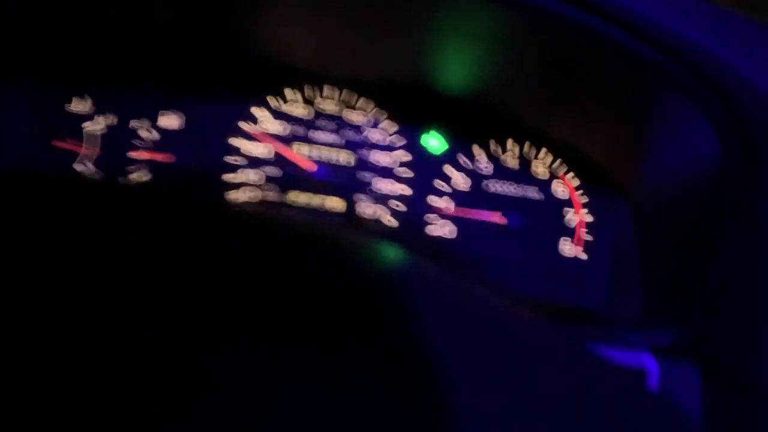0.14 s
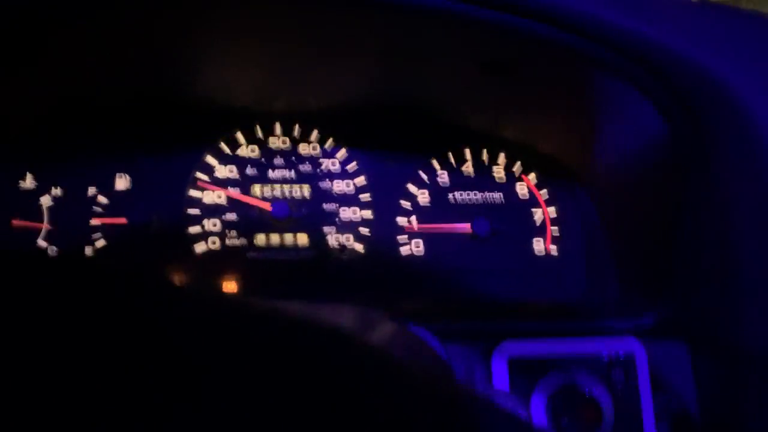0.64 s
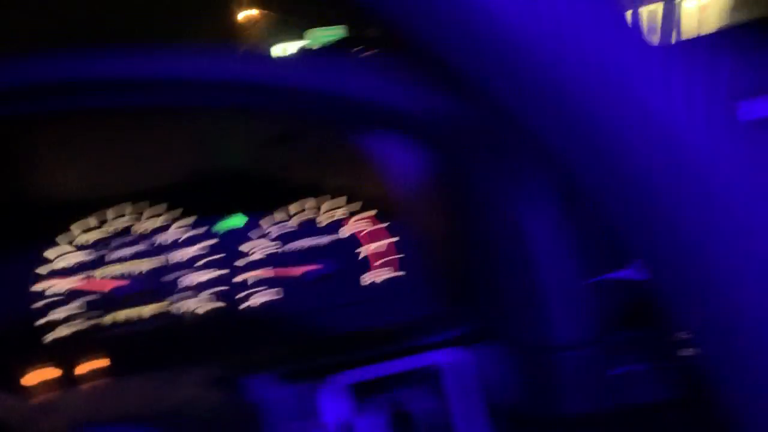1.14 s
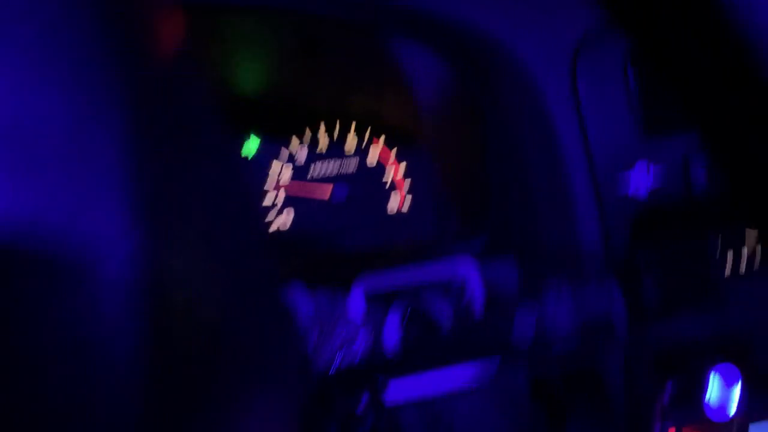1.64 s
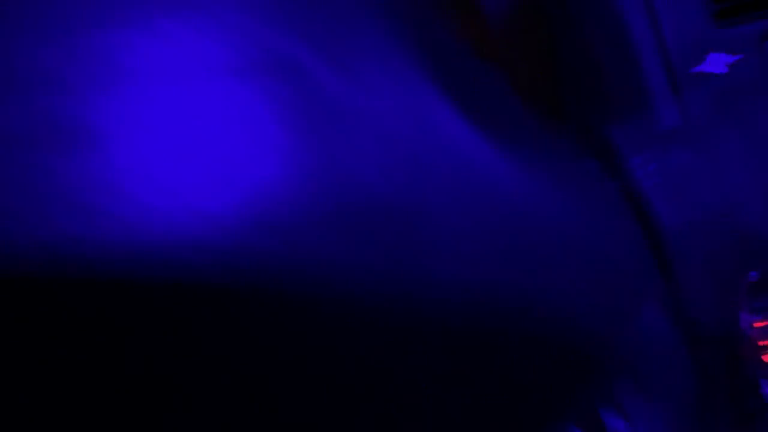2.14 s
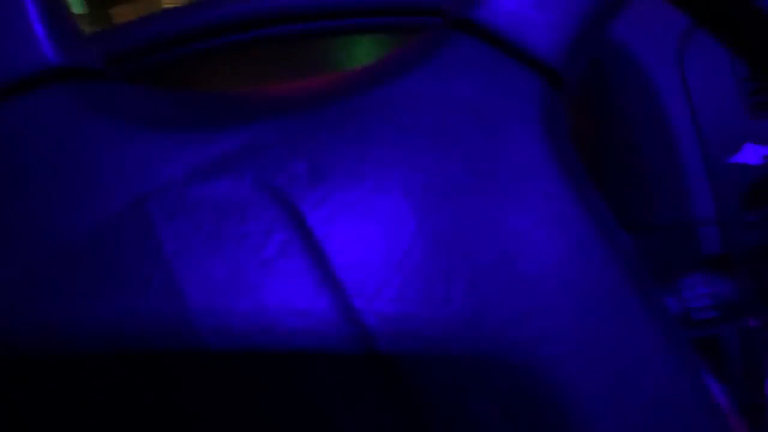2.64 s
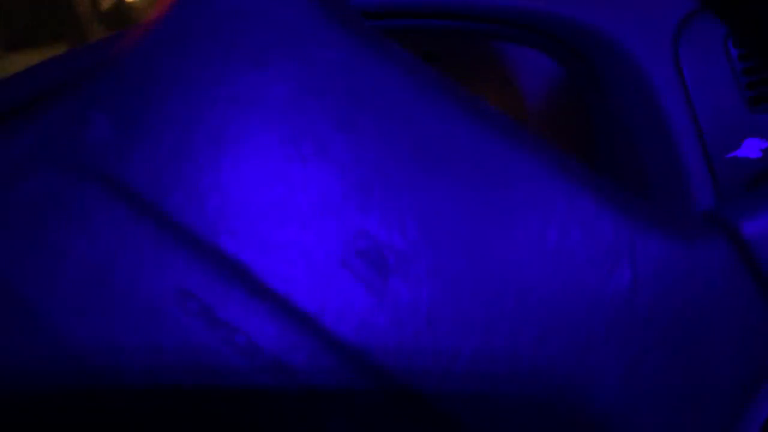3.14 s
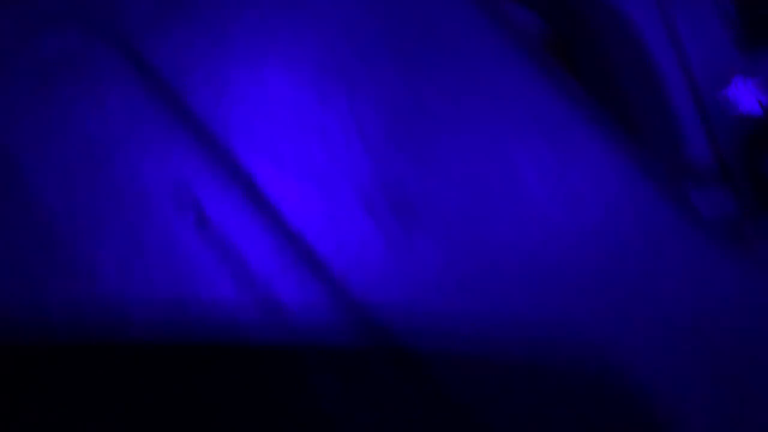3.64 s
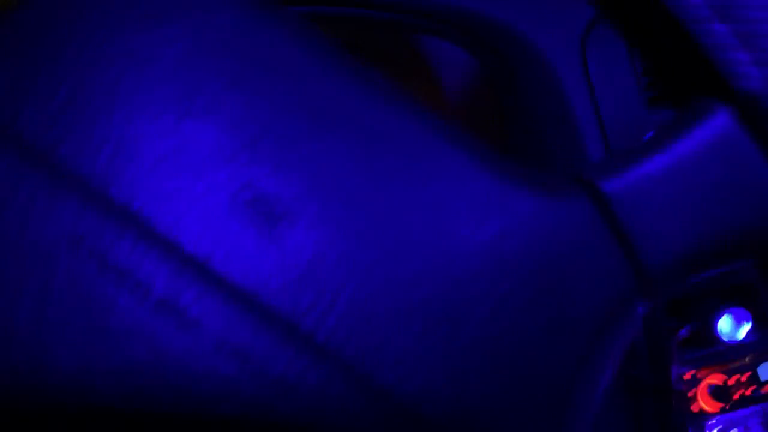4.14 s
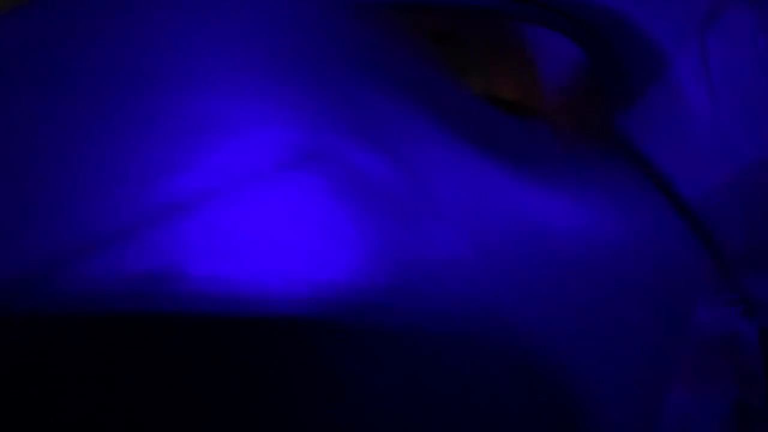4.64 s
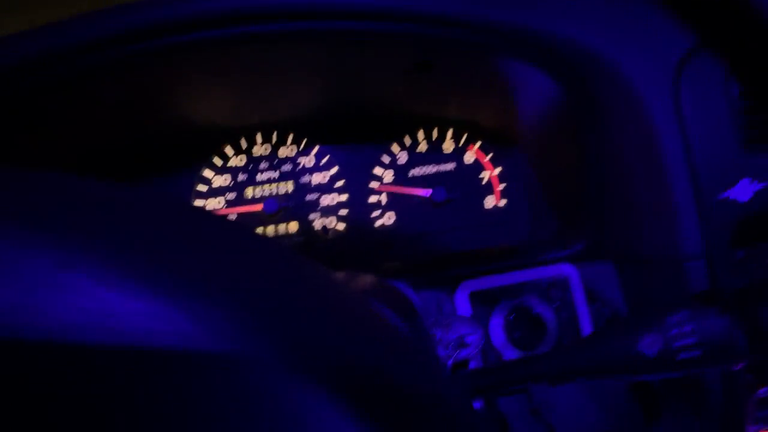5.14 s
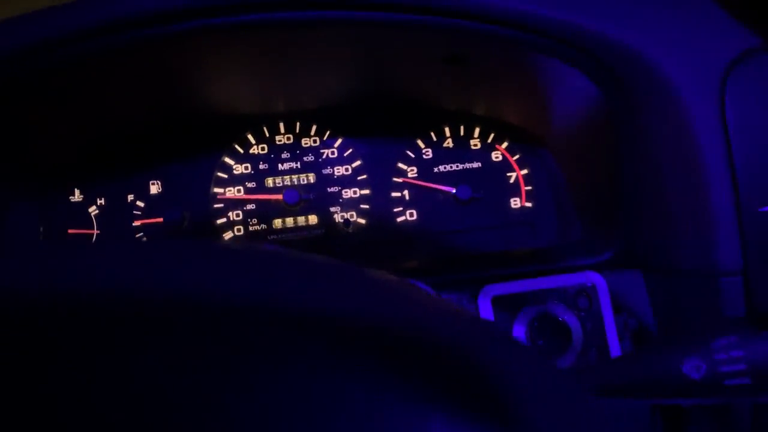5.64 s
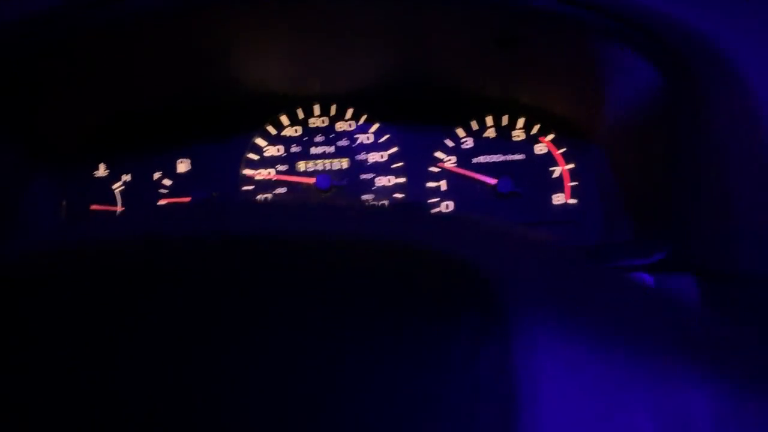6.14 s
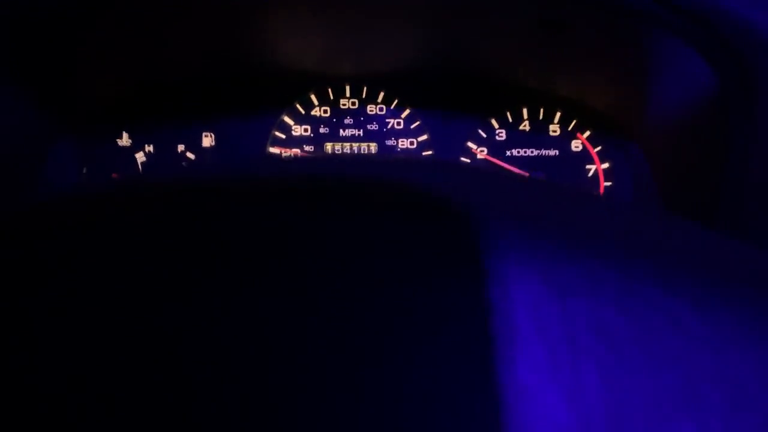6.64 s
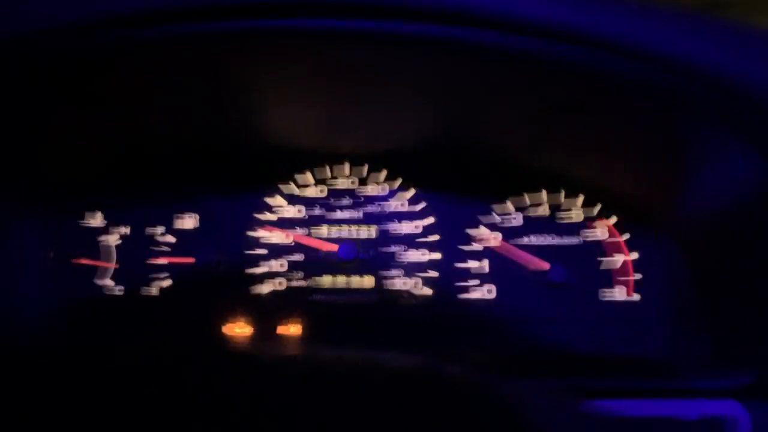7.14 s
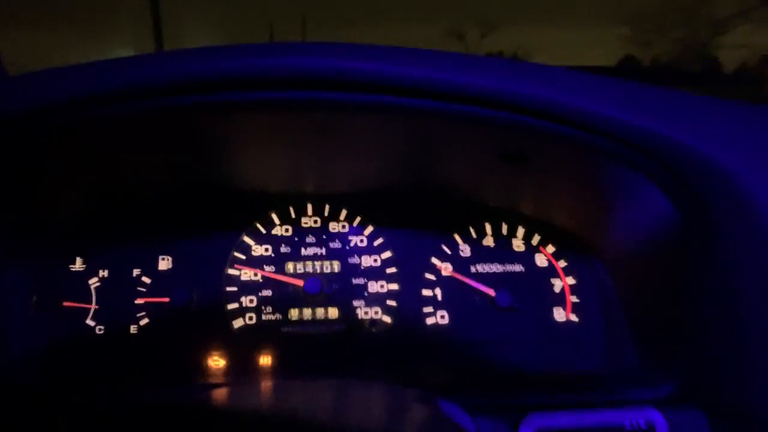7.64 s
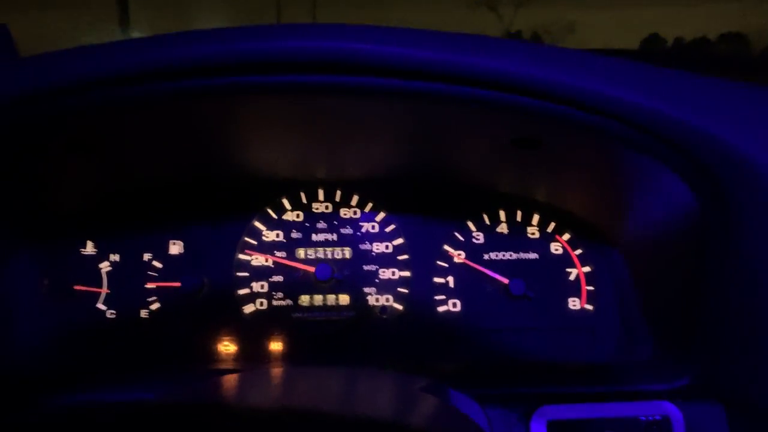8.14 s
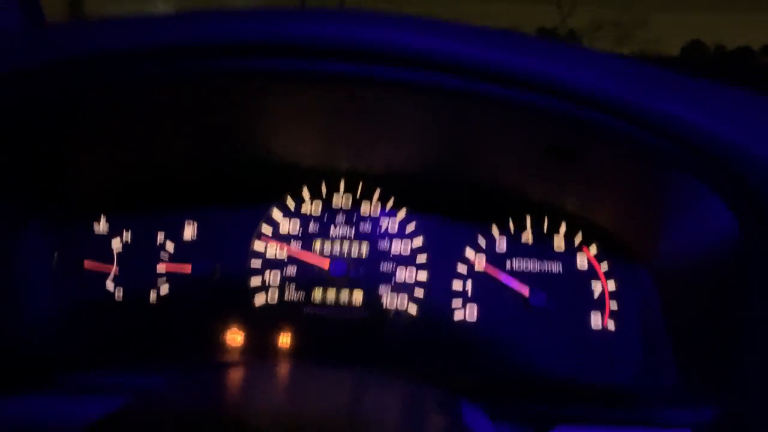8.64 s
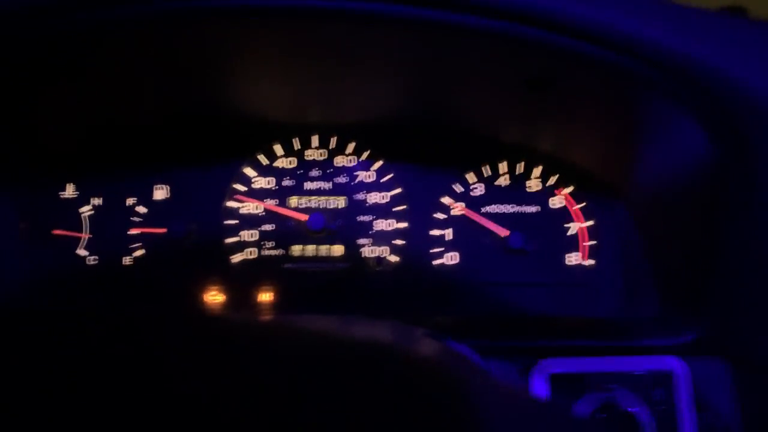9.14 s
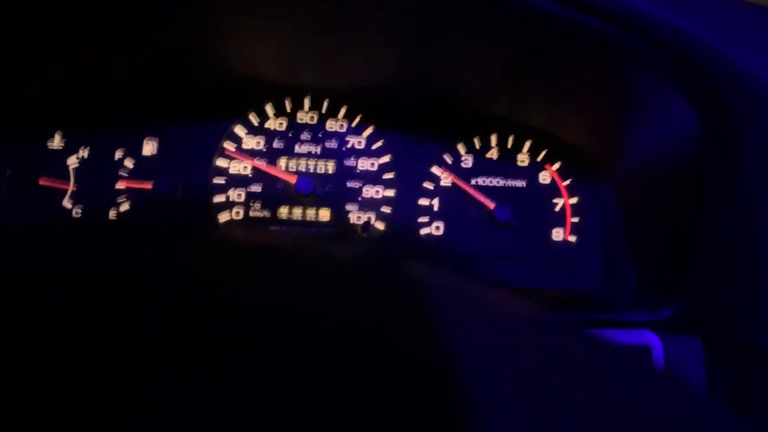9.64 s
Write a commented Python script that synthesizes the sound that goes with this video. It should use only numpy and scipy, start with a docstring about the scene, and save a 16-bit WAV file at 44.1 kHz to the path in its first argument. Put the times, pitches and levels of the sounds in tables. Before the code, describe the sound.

Inside a truck cab, a four-cylinder engine idles low with a ticking indicator, then pulls hard, lifts off briefly, and pulls again even louder and higher.

```python
"""Inside the cab of a four-cylinder truck that coasts into a turn with the indicator on, pulls away,
lifts off for a gear change and pulls again. Sine firing orders boom; shaped noise roars, hisses and drones
through ringing trim and rumbles from the tyres. Loose trim is narrow noise; squeaks are sagging tones;
the relay ticks in noise puffs for the first five seconds; switches and bumps add ringing modes."""
import sys
import numpy as np
from scipy import signal
from scipy.fft import rfft, irfft, next_fast_len
from scipy.io import wavfile
from scipy.ndimage import uniform_filter1d, map_coordinates

SR = 44100
rng = np.random.default_rng(int(sys.argv[2]) if len(sys.argv) > 2 else 0)


def wav_record(signal):
    """Record a signal, one row per channel, as 16-bit PCM in the file named by sys.argv[1]."""
    frames = np.transpose(np.atleast_2d(signal))
    bounded = np.clip(frames, -1, 1)
    # unit amplitude maps onto the largest positive 16-bit level
    quanta = np.round(bounded * 32767).astype(np.int16)
    wavfile.write(sys.argv[1], SR, quanta)


def rack_gain(trim_db):
    """Turn a fader trim in dB into the linear factor to multiply a signal by."""
    fader = np.asarray(trim_db, float)
    return 10 ** (fader / 20)


N = 431298

# Engine over time. Each row: time in seconds, firing rate in Hz, load in dB re full throttle,
# relative exhaust pulse strength in dB.
DRIVE = [(0, 28.85, -11, 5), (.4, 27.12, -13, 3.5), (.75, 28.21, -13, 1.5), (1.1, 37.5, -12.5, 0.5),
         (1.44, 44.96, -9, -0.5), (1.74, 45.27, -11.5, 3), (2.3, 43.03, -14, 1.5), (2.9, 40.93, -17.5, 3),
         (3.9, 40.4, -15.5, 2), (4.2, 40.12, -8, -1), (4.55, 42.08, -5.5, -3), (5.3, 48.54, -2.5, -2),
         (5.95, 55.23, 1, -0.5), (6.4, 59.64, 0, -1), (6.72, 62.45, -2.2, -3), (6.8, 61.84, -10, -4.5),
         (6.87, 62.2, -18.5, -0.5), (7, 61.99, -16.5, 0.5), (7.35, 61.47, -16.5, -1),
         (7.8, 60.33, -18.5, 2.5), (8.2, 60.66, -15, 0), (8.35, 61.8, -10.5, 1.5), (8.7, 62.35, -3.5, -2.5),
         (9.3, 67.4, -1.5, -1.5), (9.62, 69.23, 4, -0.5), (9.78, 71.9, 7.5, 1.5)]
# The driveline winds up and rocks the revs. Each row: start in seconds, swing in Hz, rocks per second,
# decay in seconds.
DRIVELINE_ROCKS = [(3.891, 1.58, 4.1, 1.1), (7.278, 3, 2.85, 1.1), (8.302, 1.57, 3.9, 0.3)]
# The boom lurches as the clutch opens and bites. Each row: centre in seconds, change in dB,
# half length in seconds.
CLUTCH_LURCHES = [(6.848, -7, 0.067), (7.219, 3.5, 0.11), (7.334, -9, 0.013), (8.091, -2, 0.11)]
# Firing orders 1-4. Each row: relative level in dB, dB lost per dB of load under the knee,
# extra dB at idle.
MAIN_ORDERS = [(1, 0.7, -2.5), (-1.15, 1.5, -1), (-3, 1.82, 2), (-11.5, 2.2, 4.5)]
# How exhaust and cab pass the main orders. Each row: frequency in Hz, relative gain in dB.
BOOM_RESPONSE = [(27, -24.5), (33, -35), (38, -16.5), (45, -14.5), (52, -18), (62, -20), (71, -19.5),
                 (80, -31.5), (90, -29.5), (100, -27.5), (110, -19), (125, -20), (136, -21.5), (143, -27.5),
                 (156, -15.5), (172, -14), (192, -14), (205, -21.5), (217, -46.5), (228, -22), (250, -24.5),
                 (285, -33)]
# Weaker orders. Each row: multiple of the firing rate, relative level in dB.
WEAK_ORDERS = [(.5, -19), (1.5, -3), (2.5, -7), (3.5, -15), (4.5, -12.5), (5, 3.5), (5.5, -13.5), (6, 2),
               (7, -2.5), (8, 0), (9, -3), (10, -6), (11, -1), (12, -5)]
# How the cab passes the weaker orders. Each row: frequency in Hz, gain in dB.
CAB_RESPONSE = [(15, -1), (45, 21), (80, -16), (120, -5), (190, 8), (207, -7.5), (225, -23), (280, -16.5),
                (315, -9), (345, -6.5), (390, -15.5), (440, -4), (500, -16), (600, -5.5), (740, -17),
                (820, 0), (870, -15)]
# Cab standing waves. Each row: frequency in Hz, left over right in dB.
STANDING_WAVES = [(70, -0.7), (110, 1.5), (170, 5.5), (230, -4.5), (400, -2)]

# Noise spectra. Each row: frequency in Hz, relative density in dB per Hz.
ROAR_SPECTRUM = [(600, -30.5), (900, -11), (1150, -3), (1750, -6.5), (2850, -11), (3600, -23.5),
                 (5000, -47.5)]
HISS_SPECTRUM = [(1880, -27.5), (3200, -4.5), (6120, -9), (8260, -10), (9380, -23.5), (11600, -14),
                 (13200, -34), (14100, -16.5), (15800, -22)]
DRONE_SPECTRUM = [(150, -31.5), (210, -5), (250, -1.5), (320, -13), (450, -17), (800, -17), (1150, -27),
                  (1500, -38.5), (3000, -76.5)]
RUMBLE_SPECTRUM = [(12, -37), (20, -7.5), (38, -9), (59, -5), (72, -19), (91, -15.5), (142, -8.5),
                   (239, -29), (300, -41.5), (400, -37.5), (600, -38), (900, -86.5)]
RELAY_CLOSE_SPECTRUM = [(2000, -22.5), (4500, -6.5), (6500, -12), (7300, -1.5), (8800, -0.5),
                        (10000, -11.5), (15500, -11)]
RELAY_OPEN_SPECTRUM = [(6000, -14.5), (7200, -3.5), (7600, -3.5), (8100, -11.5), (12000, -12.5),
                       (14500, -2), (15800, -9)]
PLASTIC_SPECTRUM = [(400, -26), (750, -18.5), (1100, -16), (1800, 0.5), (2700, -15), (5000, -11),
                    (6300, -6), (7900, -7.5), (9500, -10.5), (15800, -6.5)]
# Stereo noise. Each row: frequency in Hz, left-right likeness from 0 to 1.
LIKENESS = [(60, 1), (180, 0.66), (550, 0.9), (1100, 0.23), (2000, 0.26), (4970, 0.13), (15000, 0.4)]
# Trim panel resonances. Each row: frequency in Hz, rise in dB when fully awake.
PANEL_MODES = [(545, 7), (700, 4.5), (830, 6), (1085, 10), (1205, 4.5), (1375, 6.5), (1580, 7.5),
               (1815, 10.5), (2110, 7.5), (2245, 6.5), (2410, 8.5), (2590, 10.5), (2770, 3)]
# Loose trim. Each row: frequency in Hz, half width in Hz, mean level at full throttle in dB.
BUZZ_PIECES = [(1700, 48, -53), (2730, 150, -55.5), (3750, 28, -67.5), (4186, 60, -68.5), (1400, 69, -64)]
# Road roughness. Each row: time in seconds, level in dB.
ROUGHNESS = [(0, -0.7), (1.5, 5), (2.2, 2), (2.9, -6.5), (4.3, -4.5), (6.1, -9.5), (6.8, -2), (7.03, 5),
             (7.4, -1), (8.1, -9.5), (8.7, -3), (9.78, 0.5)]
# Thin squeaks. Each row: start in seconds, relative level in dB, starting pitch in Hz.
SQUEAKS = [(0.0214, -42, 11460), (0.1042, -43, 11200), (0.144, -48, 10900), (1.6581, -40.5, 11640),
           (1.7906, -42, 11450), (1.8402, -41.5, 11260), (2.503, -50, 11460), (2.696, -42.5, 11500),
           (3.023, -42, 11230), (3.118, -48, 10940), (3.343, -33.5, 11100), (3.4585, -44.5, 11230),
           (3.508, -45, 11040), (3.5796, -39, 11140), (3.806, -48, 10800), (3.9823, -47, 10860),
           (4.057, -46.5, 10700), (4.1807, -47, 10500), (4.306, -39, 11200), (4.4074, -36, 10850),
           (4.5096, -47, 10960), (4.6284, -47.5, 10350), (8.1444, -57, 10760)]
# Indicator loudness. Each row: time in seconds, level in dB.
RELAY_LEVELS = [(0, -53.5), (1.2, -48), (2.3, -53), (3, -57), (5, -53)]
# Switch snaps; the two loudest are led by a weaker burst about 12 ms earlier.
# Each row: start in seconds, relative crack level in dB, relative ring level in dB.
SNAPS = [(0.945, -32, -61), (1.352, -34, -51), (1.3634, -14.5, -25), (3.3186, -41, -63),
         (5.0757, -25.5, -43), (5.0878, -16.5, -29.5)]
# What the snaps ring. Each row: frequency in Hz, relative level in dB, 60 dB decay in seconds.
HOUSING_MODES = [(1570, -3, .04), (1810, 0, .05), (2000, -4, .04), (2300, -4, .04), (690, -1, .06),
                 (1150, -8, .04), (7500, -5, .03), (8020, 3, .025)]
# Fits of rattling trim. Each row: start in seconds, length in seconds, level in dB, frequency in Hz,
# half width in Hz.
RATTLES = [(0.979, 0.02, -53, 4520, 4900), (1.175, 0.03, -57.5, 3710, 120), (1.812, 0.014, -55, 2800, 150),
           (2.761, 0.034, -59.5, 1930, 50), (2.805, 0.0089, -55, 6200, 500),
           (2.806, 0.0089, -55, 2500, 600), (3.33, 0.049, -64, 3970, 2000), (4.127, 0.035, -51, 1570, 150),
           (4.256, 0.058, -55, 1600, 110), (4.425, .17, -48.5, 1700, 12), (3.086, 0.012, -62, 3540, 200),
           (4.52, 0.13, -64, 4050, 40), (5.102, 0.59, -63.5, 3584, 26), (5.33, 0.035, -45, 1550, 250),
           (5.469, 0.029, -51, 2655, 145)]
# Bumps. Each row: start in seconds, relative knock level in dB, relative thump level in dB.
BUMPS = [(1.483, -22, -15), (2.473, -29, -21.5), (2.528, -34, -49), (2.8079, -33, -47), (3.259, -37, -30.5),
         (4.274, -35.5, -34), (4.427, -33, -37), (6.997, -33.5, -26.5), (8.104, -42, -41.5)]
# What the bumps ring. Each row: frequency in Hz, relative level in dB, 60 dB decay in seconds.
FLOOR_MODES = [(131.86, -1, 0.95), (175, 4, 0.15), (185, -1, 0.43), (369, -10.5, 0.35), (480, -8, 0.14),
               (710, -20.5, 0.043)]
# Arrival at the ports. Each row: frequency in Hz, lead of the left port in radians.
LEFT_LEAD = [(0, 0), (60, .06), (250, .6), (1300, 1.2), (2300, 1.5), (2800, 5.5), (3700, 6.1), (5170, 6.8),
             (5500, 8.3), (7060, 11.7), (16000, 26.7)]

# Engine orders
IDLE_HZ, IDLE_FADE_HZ = 30.5, 2.5  # the idle lope is gone this far above the idle firing rate
IDLE_LOPE_DB, IDLE_LOPE_HZ = 3.5, 241  # at idle the weaker orders below this pitch stand out
EXHAUST_LAG_S = 0.055  # the pipe follows the throttle late
FIRING_WANDER_SHARE = .002
KNEE_DB = -6.5  # load above which the main orders stop growing
BITE_DB_PER_DB = 1  # load per upward lurch
SLACK_WAVER_DB_PER_DB = .2  # extra overtone waver per dB of load under the knee
WEAK_DB, WEAK_DB_PER_DB = -34.5, 0.49  # relative level at full throttle; growth with load
GROWL_HZ, GROWL_WIDTH_HZ, GROWL_DB = 54.15, 2.1, 6  # firing rate at which the weaker orders swell
# Noises entering the trim, at full throttle; growth per dB of load, and of roughness
ROAR_DB, HISS_DB, HISS_DB_PER_DB, HISS_IDLE_DB = -47.5, -53, 1.275, -86
DRONE_DB, DRONE_DB_PER_DB, DRONE_DB_PER_ROAD_DB = -34.5, 0.69, 0.37
# Panels: load range of waking, lowest wake share allowed, fitfulness of each
PANEL_WAKES_DB, PANEL_LOWEST_SHARE, PANEL_FIT_SHARE = 14, .4, .18
PANEL_HALF_WIDTH_HZ, PANEL_DRIFT_SHARE = 19, .003
BUZZ_DB_PER_DB, BUZZ_FLUTTER_DB, BUZZ_SHAKE_DB = 1.7, 3, 2  # load growth; own flutter; shared flutter
RUMBLE_DB = -26.5  # at 0 dB roughness
RELAY_START_S, RELAY_PERIOD_S, RELAY_ON_S = .1017, .3129, .1295
PORT_SCATTER = .25  # strength of a crack's part that is opposite at the two ports


def unit(x):
    """Scale to rms 1."""
    return x / np.sqrt(np.mean(x ** 2) + 1e-20)


def along(points, hz):
    """Read (Hz, value) points on a log axis."""
    f, v = np.transpose(points)
    return np.interp(np.log(hz + 1), np.log(f + 1), v)


def curves(rows):
    """One value per sample for each column after the time."""
    s, *cols = np.transpose(rows)
    return [np.interp(np.arange(N) / SR, s, c) for c in cols]


def wobble(rate_hz):
    """A smooth random curve, rate_hz knots a second."""
    knots = rng.standard_normal(int(N * rate_hz / SR) + 4)
    return map_coordinates(knots, [np.arange(N) * rate_hz / SR])


def filtered(x, response):
    """x times a complex response of frequency."""
    m = next_fast_len(N + SR // 2)
    return irfft(rfft(x, m) * response(np.fft.rfftfreq(m, 1 / SR)), m)[..., :N]


def rush(spectrum, patchy_db):
    """Stereo noise of rms 1 with patches of random gain."""
    z = signal.stft(rng.standard_normal((2, N)), nperseg=1024)[2]
    field = rng.standard_normal(z.shape[1:])
    field = uniform_filter1d(uniform_filter1d(field, 5, 0), 8, 1)
    pair = signal.istft(z * rack_gain(patchy_db * unit(field)), nperseg=1024)[1][:, :N]

    def mid_side(hz):
        turn = np.arccos(np.clip(along(LIKENESS, hz), -1, 1)) / 2
        return rack_gain(along(spectrum, hz)) * [np.cos(turn), np.sin(turn)]

    mid, side = filtered(pair, mid_side)
    return unit(np.array([mid + side, mid - side]))


def bursts(events, spectrum, t60_s, tail_db, tail_t60_s):
    """Coloured noise puffs: a sharp crack and the cab's short answer, a little different at each port."""
    shape, t = np.zeros(N + SR), np.arange(SR // 5) / SR
    for s, db in events:
        crack = (1 - np.exp(-t / (t60_s / 30))) * rack_gain(db - 60 * t / t60_s)
        answer = rack_gain(db + tail_db - 60 * t / tail_t60_s)
        shape[round(s * SR):][:len(t)] += crack + answer
    shared, own = rng.standard_normal((2, N))
    noise = shared + PORT_SCATTER * own * [[1], [-1]]
    scale = np.sqrt(np.mean(rack_gain(along(spectrum, np.arange(SR // 2))) ** 2))
    return filtered(shape[:N] * noise, lambda hz: rack_gain(along(spectrum, hz))) / scale


def rings(events, modes):
    """Every blow rings the same decaying modes, in chance proportions."""
    out, t = np.zeros(N + SR), np.arange(SR // 3) / SR
    chance_db = rng.standard_normal((len(events), len(modes)))
    for (s, db), spread_db in zip(events, chance_db):
        ring = sum(rack_gain(db + level_db + e_db - 60 * t / t60_s) * np.sin(2 * np.pi * hz * t)
                   for (hz, level_db, t60_s), e_db in zip(modes, spread_db))
        out[round(s * SR):][:len(t)] += ring * (1 - np.exp(-t / 0.0018))
    return out[:N]


def firing_hz():
    """The firing rate, with damped rocking of the revs from each listed start."""
    t = np.arange(N) / SR
    rock = 0
    for s, swing_hz, rate_hz, decay_s in DRIVELINE_ROCKS:
        decay = (t > s) * np.exp(-np.abs(t - s) / decay_s)
        rock = rock + swing_hz * decay * np.sin(2 * np.pi * rate_hz * (t - s))
    return curves(DRIVE)[0] + rock


def engine():
    """Firing orders boom through exhaust and cab; uneven cylinders add half orders."""
    hz, t = firing_hz(), np.arange(N) / SR
    _, load_db, pulse_db = curves(DRIVE)
    load_db = np.interp(t - EXHAUST_LAG_S, t, load_db)
    lurch_db = sum(db * np.exp(-((t - s) / half_s) ** 4) for s, db, half_s in CLUTCH_LURCHES)
    slack_db = np.minimum(load_db + BITE_DB_PER_DB * np.maximum(lurch_db, 0) - KNEE_DB, 0)
    idling = np.clip(1 - (hz - IDLE_HZ) / IDLE_FADE_HZ, 0, 1)
    phase = 2 * np.pi * np.cumsum(hz * (1 + FIRING_WANDER_SHARE * wobble(12))) / SR
    boom = np.zeros(N)
    for k, (db, loses, idle_db) in enumerate(MAIN_ORDERS):
        order_db = pulse_db + lurch_db + db + loses * slack_db + idle_db * idling
        passed_db = along(BOOM_RESPONSE, (k + 1) * hz) + 5.0
        waver_db = (0.6 - SLACK_WAVER_DB_PER_DB * slack_db * min(k, 1)) * wobble(13)
        boom += rack_gain(order_db + passed_db + waver_db) * np.sin((k + 1) * phase + 0.92 * k)
    growl_db = GROWL_DB * np.exp(-((hz - GROWL_HZ) / GROWL_WIDTH_HZ) ** 2)
    weak_db = WEAK_DB + WEAK_DB_PER_DB * load_db + growl_db + lurch_db
    for k, db in WEAK_ORDERS:
        high = np.clip((k * hz - 230) / 60, 0, 1) * np.clip((k - 5) / 3, 0, 1)
        fade_db = .55 * np.minimum(load_db, 0) * high  # high orders fade off throttle
        lope_db = IDLE_LOPE_DB * idling * (k * IDLE_HZ < IDLE_LOPE_HZ)
        order_db = weak_db + lope_db + db + fade_db + along(CAB_RESPONSE, k * hz) + 1.5 * wobble(6.5)
        boom += rack_gain(order_db) * np.sin(k * phase + .02 * k * wobble(10) + k * k)
    return filtered(boom, lambda f: rack_gain(along(STANDING_WAVES, f) / 2 * np.array([[1], [-1]])))


def combed(x):
    """The cab's dense echoes colour a noise at fixed, close pitches."""
    t = np.arange(SR // 8) / SR
    echoes = unit(rng.standard_normal(len(t)) * rack_gain(-60 * t / .2)) * rack_gain(-10) / np.sqrt(len(t))
    echoes[0] = 1  # direct sound
    return signal.fftconvolve(x, echoes[None], axes=1)[:, :N]


def intake():
    """Intake roar and hiss grow with load, pulsing at the firing rate and half of it."""
    load_db = curves(DRIVE)[1]
    phase = 2 * np.pi * np.cumsum(firing_hz()) / SR
    puffs = 1 + 0.12 * np.cos(phase) + 0.13 * np.cos(phase / 2)
    roar = rack_gain(ROAR_DB + load_db + 0.25 * wobble(2.4)) * rush(ROAR_SPECTRUM, patchy_db=2.2)
    hiss_gain = rack_gain(HISS_DB + HISS_DB_PER_DB * load_db) + rack_gain(HISS_IDLE_DB)
    hiss = hiss_gain * rack_gain(0.61 * wobble(5.4)) * rush(HISS_SPECTRUM, patchy_db=2.5)
    return combed(puffs * (roar + hiss))


def drone():
    """The body drones: noise that grows with load and road roughness."""
    drive_db = DRONE_DB_PER_DB * curves(DRIVE)[1] + DRONE_DB_PER_ROAD_DB * curves(ROUGHNESS)[0]
    return rack_gain(DRONE_DB + drive_db + 0.95 * wobble(12.0)) * rush(DRONE_SPECTRUM, patchy_db=1.85)


def panels(x):
    """Noise sets the trim panels singing, each fitfully, and less at the lightest loads."""
    f, t, z = signal.stft(x, SR, nperseg=4096)
    at = np.minimum((t * SR).astype(int), N - 1)
    awake = np.clip(2 + curves(DRIVE)[1][at] / PANEL_WAKES_DB, PANEL_LOWEST_SHARE, 1)
    gain = 1
    for hz, db in PANEL_MODES:
        fit = np.clip(1 + PANEL_FIT_SHARE * wobble(4)[at], 0, 2)
        centre_hz = hz * (1 + PANEL_DRIFT_SHARE * wobble(3.2)[at])
        peak = 1 / (1 + ((f[:, None] - centre_hz) / PANEL_HALF_WIDTH_HZ) ** 2)
        gain = gain + (rack_gain(db * awake * fit) - 1) * peak
    return signal.istft(z * gain, SR, nperseg=4096)[1][:, :N]


def buzz():
    """Loose trim buzzes in fits under load, each piece a narrow noise at its own pitch."""
    load_db = curves(DRIVE)[1]
    shake_db = BUZZ_SHAKE_DB * wobble(25)
    out = np.zeros(N)
    for hz, width_hz, db in BUZZ_PIECES:
        level_db = db + BUZZ_DB_PER_DB * np.minimum(load_db, 0) + shake_db
        flutter_db = BUZZ_FLUTTER_DB * wobble(22) + 2.0 * wobble(1.4)
        piece = filtered(rng.standard_normal(N), lambda f: 1 / (1 + ((f - hz) / width_hz) ** 2))
        out += rack_gain(level_db + flutter_db) * unit(piece)
    return out


def road():
    """Tyres rumble: low noise that follows the road's roughness."""
    lumps = rack_gain(1.6 * wobble(9))
    return rack_gain(RUMBLE_DB + curves(ROUGHNESS)[0]) * lumps * rush(RUMBLE_SPECTRUM, patchy_db=2.5)


def squeaks():
    """Stick-slip: narrow tones that stutter and sag."""
    out, t = np.zeros(N + SR), np.arange(SR // 8) / SR
    flutter, drift = wobble(110), wobble(280)
    held = np.clip(t / 0.0037, 0, 1) * rack_gain(-60 * np.clip(t - .025, 0, None) / 0.02)
    for s, db, hz in SQUEAKS:
        at = round(s * SR)
        pitch_hz = hz - 9000 * (hz / 11000) ** 2 * t + 110 * drift[at:][:len(t)]
        stutter = 0.35 + 0.17 * flutter[at:][:len(t)]
        tone = np.sin(2 * np.pi * np.cumsum(pitch_hz) / SR)
        out[at:][:len(t)] += rack_gain(db - 1) * held * stutter * tone
    return out[:N]


def indicator():
    """The relay's clicks on closing and on opening differ in colour."""
    s = RELAY_START_S + RELAY_PERIOD_S * np.arange(16)
    db = np.interp(s, *np.transpose(RELAY_LEVELS)) + 1.5 * rng.standard_normal((len(s), 2)).T
    closing = bursts(zip(s, db[0]), RELAY_CLOSE_SPECTRUM, 0.045, -5.0, 0.13)
    opening = bursts(zip(s + RELAY_ON_S, db[1] + 0.5), RELAY_OPEN_SPECTRUM, 0.023, -1.5, 0.089)
    return closing + opening


def snaps():
    """Switch snaps: noise cracks over the ringing modes of the housing."""
    crack = bursts([row[:2] for row in SNAPS], PLASTIC_SPECTRUM, 0.046, -11.5, 0.12)
    return rack_gain(-7.0) * crack + rack_gain(2.5) * rings([row[::2] for row in SNAPS], HOUSING_MODES)


def rattles():
    """Each fit of rattling trim is a resonant, stuttering noise."""
    out, stutter = np.zeros(N), rack_gain(1.8 * wobble(90) + 1.2 * wobble(18))
    t = np.arange(SR) / SR
    f = np.fft.rfftfreq(len(t), 1 / SR)
    for s, length_s, db, hz, width_hz in RATTLES:
        resonance = 1 / (1 + ((f - hz) / width_hz) ** 2)
        noise = unit(irfft(rfft(rng.standard_normal(len(t))) * resonance, len(t)))
        fall = rack_gain(db - 60 * np.clip(t - length_s, 0, None) / 0.055)
        out[round(s * SR):][:len(t)] += fall * np.clip(t / 0.0084, 0, 1) * noise
    return out * stutter


def bumps():
    """Bumps knock the trim (noise) and thump the floor (modes)."""
    knock_spectrum = [(200, -30), (380, 0), (520, -1), (800, -8), (2000, -19), (4000, -45)]  # Hz, dB per Hz
    knock = bursts([row[:2] for row in BUMPS], knock_spectrum, .14, -14, .25)
    return rack_gain(-6.5) * knock + rack_gain(-2.5) * rings([row[::2] for row in BUMPS], FLOOR_MODES)


def scene():
    """Everything heard in the cab."""
    through_trim = panels(intake() + drone())
    steady = engine() + through_trim + buzz() + road()
    return steady + squeaks() + indicator() + snaps() + rattles() + bumps()


def roll_off(x):
    """The treble ends steeply here."""
    return signal.sosfilt(signal.butter(12, 16510, fs=SR, output="sos"), x)


def record(dry):
    """Sound reaches the left port first; the band ends at 15830 Hz."""
    def ports(f):
        lead_rad = np.interp(f, *np.transpose(LEFT_LEAD))
        return (f < 15830) * np.exp(.5j * lead_rad * np.array([[1], [-1]]))

    return roll_off(filtered(dry, ports))


dry = scene()
out = record(dry)
wav_record(out)
```